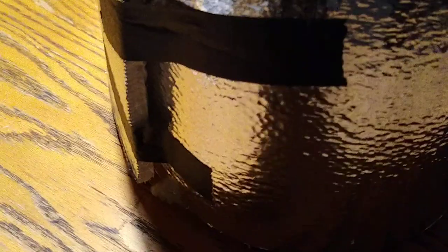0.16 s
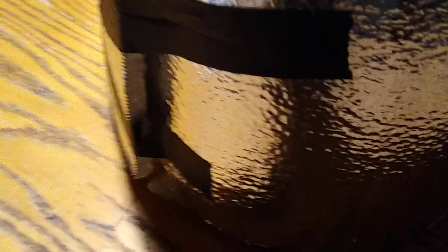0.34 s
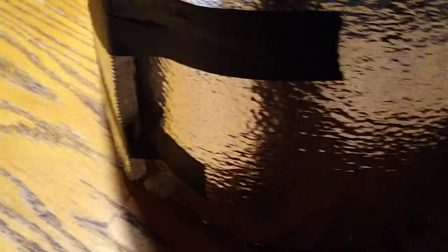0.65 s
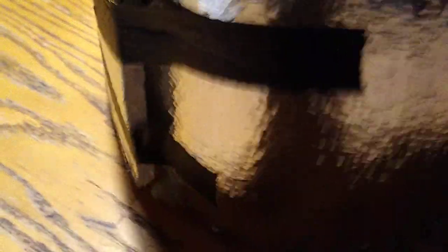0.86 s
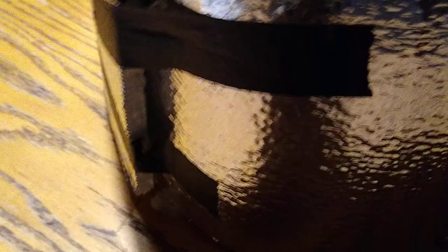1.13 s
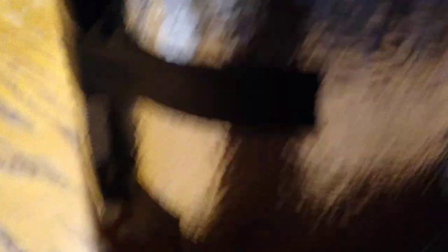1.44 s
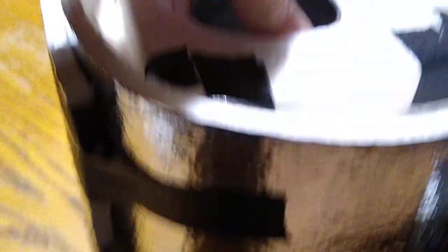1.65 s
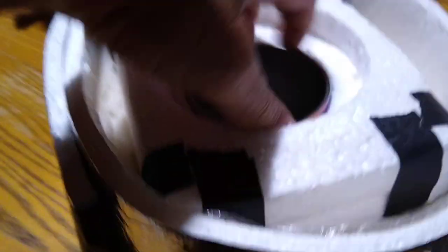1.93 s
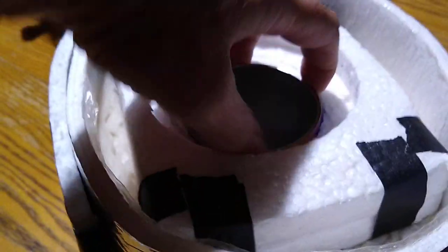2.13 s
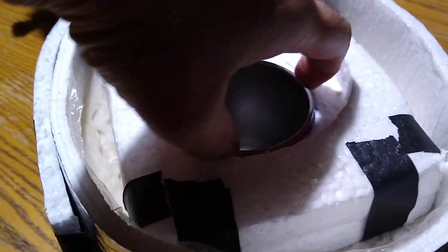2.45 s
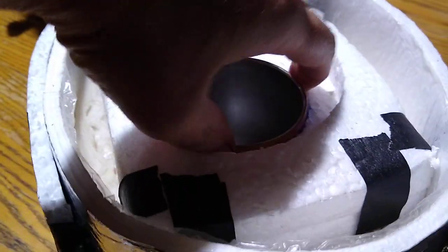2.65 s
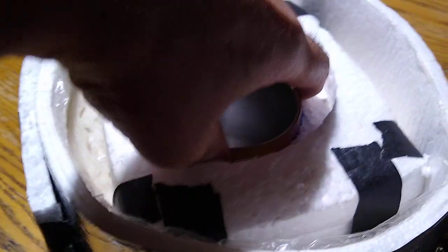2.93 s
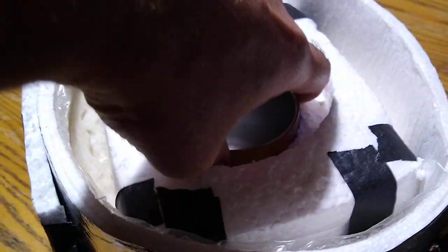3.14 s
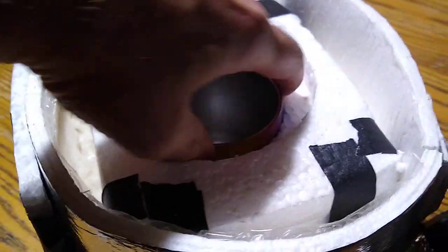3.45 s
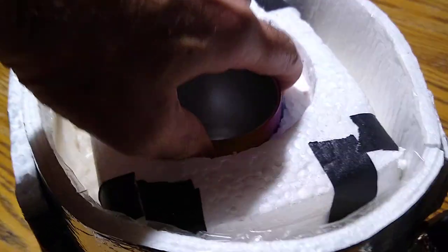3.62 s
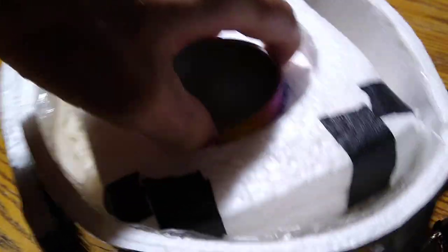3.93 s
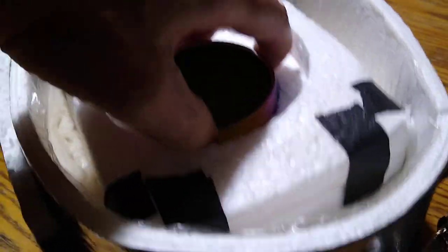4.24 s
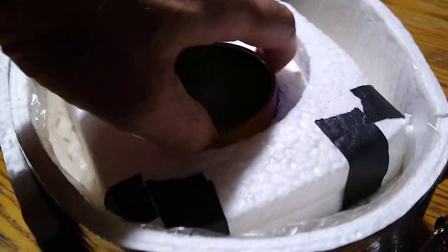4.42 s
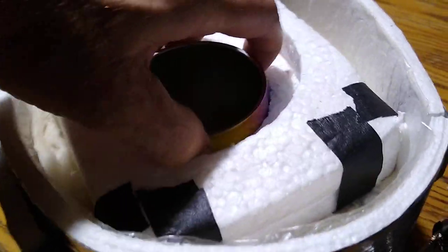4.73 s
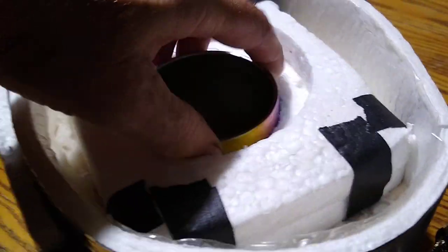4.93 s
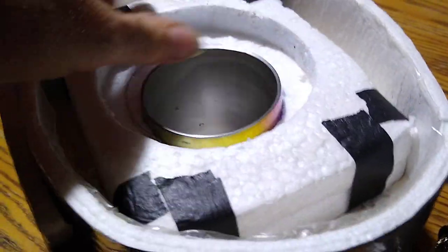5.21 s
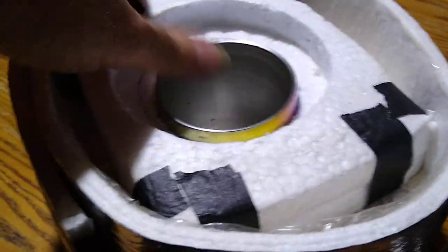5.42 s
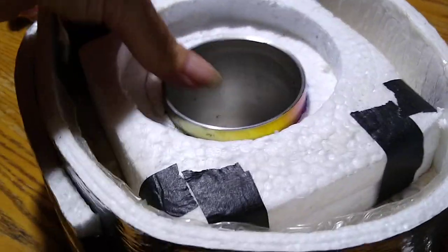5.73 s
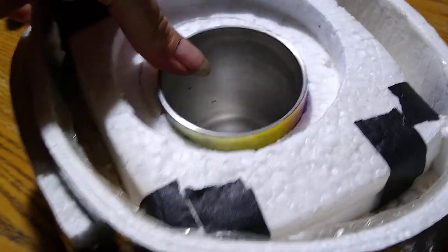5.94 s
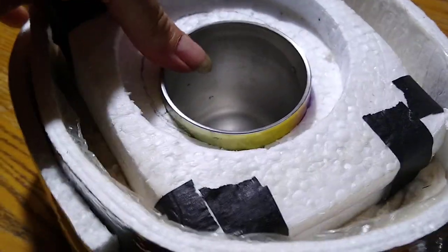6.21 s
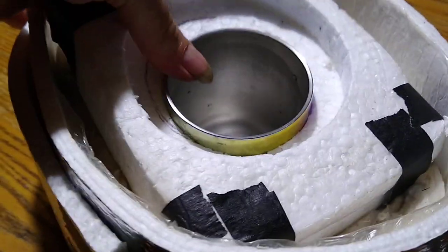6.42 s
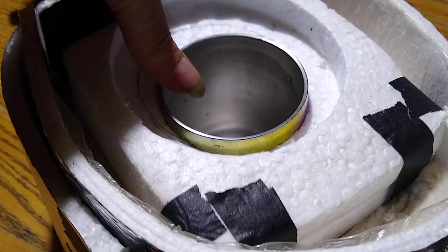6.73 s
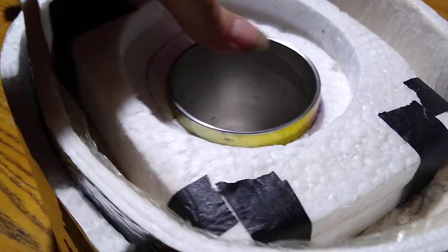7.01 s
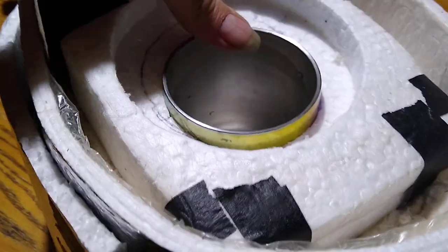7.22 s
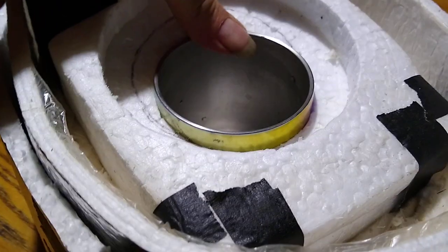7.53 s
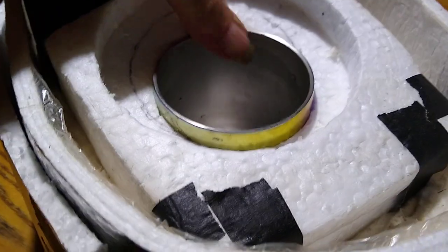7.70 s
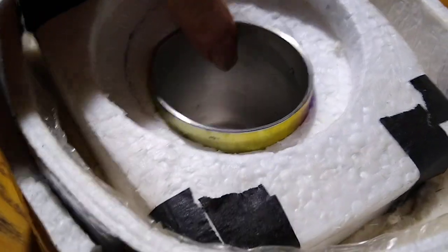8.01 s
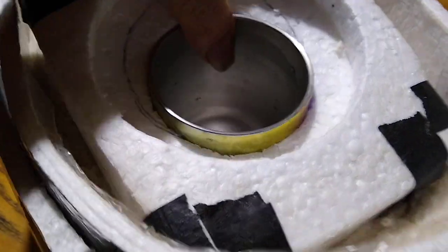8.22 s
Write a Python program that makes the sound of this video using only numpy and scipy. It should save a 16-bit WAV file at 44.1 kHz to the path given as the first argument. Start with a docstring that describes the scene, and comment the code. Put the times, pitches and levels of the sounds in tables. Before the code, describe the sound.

Close-up foam handling: short dry scrapes, crackling wrap, popping beads and hollow knocks, sparse at first, then busier rubbing, over faint room hush.

```python
"""Hands rub and squeeze rigid foam in plastic wrap, close to a phone in a quiet room.
Strokes are dense swarms of tiny slips through resonances of scrape, drumming foam and sizzling wrap.
The wrap snaps and rustles, beads pop, fingers knock the hollow foam, a joint creaks, a cupped cavity hums.
Shaped noise makes the room's hush. Two microphone ports hear it all, and the phone widens the image
by taking each port, delayed, from the other."""
import sys
import numpy as np
from scipy import signal
from scipy.fft import rfft, irfft
from scipy.io import wavfile
from scipy.ndimage import uniform_filter1d

SR = 44100
rng = np.random.default_rng(int(sys.argv[2]) if len(sys.argv) > 2 else 0)


def persist_wave(psi):
    """Save psi, clipped to +-1, as 16-bit WAV."""
    counts = np.round(np.clip(psi, -1, 1) * 32767).astype(np.int16)
    wavfile.write(sys.argv[1], SR, np.atleast_2d(counts).T)


def voltage_ratio(level):
    """Linear amplitude factor for a level in decibels (scalar or array-like)."""
    return 10 ** (np.asarray(level, float) / 20)


N = 368676
T = np.arange(N) / SR
CONTROL = 64  # samples per control step

# strokes of the hand: peak_s, rise_ms, fall_ms (to 1/e of the peak), scrape_db
STROKES = [(0.016, 16, 21.5, -52.5), (0.208, 22, 28.6, -56), (0.322, 6.6, 29, -61),
           (0.403, 7.2, 18.6, -60.5), (0.563, 40, 49, -64.5), (0.667, 32, 31, -58.5),
           (0.769, 15, 36, -52.5), (0.965, 65, 11.6, -48), (1.041, 41, 14, -51.5),
           (1.156, 54.4, 57.5, -40.5), (1.284, 14, 54, -60), (1.369, 24, 26.6, -62.5),
           (1.748, 110, 96, -55.5), (1.978, 46, 9, -50.5), (2.035, 27, 37, -38), (2.15, 84, 110, -46),
           (2.364, 2.1, 36, -50), (2.75, 40, 29, -48.5), (3.06, 105, 270, -68), (3.44, 38, 27, -52.5),
           (3.542, 48, 120, -62), (3.746, 38, 65, -58.5), (3.809, 13, 26, -54), (3.866, 16, 57, -52.5),
           (3.992, 30, 28, -51), (4.09, 30, 44, -49.5), (4.28, 13, 9, -59.5), (4.317, 6, 45, -54),
           (4.683, 17.3, 100, -72.5), (4.83, 14, 18, -57.5), (5.006, 56, 12, -44), (5.055, 27, 19, -42.5),
           (5.15, 48, 27, -49), (5.255, 12.3, 53, -43.5), (5.353, 19, 16, -46), (5.437, 24.4, 140, -46),
           (5.567, 18.5, 47, -36), (5.662, 23, 16, -48.5), (5.704, 10, 60, -48.5), (5.839, 34, 77, -50.5),
           (6.047, 3.1, 12, -40.5), (6.076, 29, 56, -40), (6.36, 75, 83, -60), (6.534, 45, 52, -42.5),
           (6.69, 15.6, 52, -43), (6.781, 41, 65, -35.5), (7.002, 74, 44, -44), (7.142, 36, 48, -42),
           (7.308, 19, 28, -36.5), (7.43, 72, 47, -38), (7.51, 35, 33.4, -39), (7.808, 56, 91, -45),
           (7.947, 32, 31, -51.5), (8.068, 24, 70, -50), (8.22, 63, 33, -54.5), (8.296, 8.2, 40, -56.5)]
# snaps of wrap and beads: start_s, crack_db, drumming_db, sizzle_db (last two relative to the crack)
SNAPS = [(0.0883, -48.5, 1, 4.5), (0.1281, -17, -15, -3), (0.134, -20.5, -4, -6), (0.3226, -53, -5, 13),
         (0.4047, -53.5, -3, 13), (0.699, -39, -3, 1), (0.7964, -38, -41, 9), (0.92, -40.5, -6, 1.5),
         (1.0308, -32.5, -2, 2.5), (1.1428, -25.5, -2.5, 5.5), (1.436, -41, 1.5, -3),
         (1.5051, -42.5, 15, 15), (1.5247, -43, 13.5, 5.5), (2.1107, -19, -8.5, 6.5),
         (2.136, -24, -11.5, -1), (2.1765, -20.5, -44, -3.5), (2.2579, -35, -4, 8.5),
         (2.2918, -32.5, -0.5, 2.5), (2.5589, -31.5, -5, 4), (2.61, -32.5, -3.5, 2),
         (2.7773, -12.5, -13, -10), (2.892, -39, -33, -2), (3.217, -38.5, -8.5, 0.5),
         (3.7407, -37, -0.5, 4.5), (4.0577, -16, -14, -2), (4.1627, -33.5, 3.5, -0.5),
         (4.683, -54, -4, 7.5), (4.8985, -44.5, -7, -2.5), (4.914, -53, -10, -1.5),
         (5.0483, -28.5, -12, -6), (5.164, -41, -20, 10), (5.237, -44.5, 6, -9), (5.5626, -31.5, -26, 6),
         (6.0754, -32.5, 4, 1.5), (7.3009, -23.5, -7, -19), (7.6338, -35, -3.5, 4), (7.823, -34.5, -3, -2),
         (7.9114, -31.5, -6, -6.5), (7.935, -34, -2, -10), (7.957, -39.5, -0.5, -4), (8.199, -43.5, -4, 10),
         (8.2097, -32, -7.5, 8.5)]
# finger knocks: start_s, level_db (before the port gains), pitch_hz (nominal, bent by the sag)
KNOCKS = [(.942, -25.5, 580), (1.504, -25, 576), (1.523, -33.5, 267), (1.75, -42, 188), (2.663, -31.5, 302),
          (3.22, -43.5, 142), (4.164, -23.5, 210), (6.078, -30.5, 141), (7.248, -23.5, 1206),
          (7.299, -24.5, 228), (8.224, -40.5, 109)]
# stick-slip creaks: start_s, end_s, first_slips_per_s, last_slips_per_s, level_db (before the family's)
CREAKS = [(2.82, 3.003, 150, 200, -45), (3.015, 3.169, 70, 80, -52.5), (3.398, 3.475, 74, 210, -43.5)]
# cupped hand: start_s, end_s, pitch_hz of the hollow, hum_db relative to the drumming
CUPPED = [(0.924, 0.977, 1320, 0), (1.11, 1.254, 1290, -4.5), (1.37, 1.396, 1330, -1),
          (2.093, 2.344, 718, -0.5), (4.653, 4.74, 1080, -0.5), (4.945, 5.21, 704, -4.5),
          (5.23, 5.93, 730, -10)]
# balance as the grip moves round the foam: time_s, drumming_db and sizzle_db (relative to the scrape),
# tilt_db_per_octave of the drumming about PIVOT_HZ
GRIP = [(0, 2.5, 6.5, 4), (.4, -4, 6.5, -2.5), (.8, 0, 1, 1.5), (.96, 4.5, 5.5, -2), (1.159, 0.5, 4, 1.5),
        (1.5, 12.5, 15.5, -2.5), (1.75, 0.5, -0.5, 0), (2.03, -6.5, 2, 0), (2.7, 0, -1, -1),
        (3.2, -5, -8.5, 1), (4.001, -7.5, -5, -1.5), (4.17, 0.5, -1, -2), (5.1, -1.5, 3, 0.5),
        (5.26, -1, -3.5, -0.5), (6.3, -3, -3.5, 1.5), (7.0, -2, -1, 2), (8.3, -4.5, -2, 2.5)]
# resonances of foam body, scraped surface and wrap: pitch_hz, width_hz, level_db, left_db (relative to right)
BODY = [(95.5, 115, -0.5, 3.5), (210, 185, -1, 1.5), (399, 276, -1.5, -3), (659, 370, -1.5, -6),
        (1012, 480, -7.5, 1), (1324, 480, -4.5, -5), (1960, 1700, -2.5, -11.5)]
SCRAPE = [(2513, 1340, 1, -4), (3055, 425, 1, -5), (3380, 710, 5, -16.5), (3983, 1500, -2.5, -2.5)]
SIZZLE = [(5870, 2940, -6.5, 1), (8800, 5900, -14.5, 5.5), (9200, 720, -5.5, 8.5), (11330, 3000, -5.5, 4),
          (14630, 6040, 4.5, -3)]
# scrape, drumming, sizzle in turn: resonances, common_share (0-1, of both ports), waver_db, snap_t60_s, creak_db
FAMILIES = [(SCRAPE, 0.045, 2.82, 0.0065, 0), (BODY, 0.89, 3.04, 0.0051, -8),
            (SIZZLE, 0.061, 2.7, 0.0085, -9.5)]
# colour of the room's hush: pitch_hz, level_db per Hz (relative)
ROOM = [(30, -9), (100, 6.5), (212, -0.5), (238, 8), (265, -1.5), (3200, -9), (6000, -21.5), (15000, -18.5)]
# copy taken from the other side: pitch_hz, share (0-1), extra_lag_cycles
CROSSFEED = [(0, 0.94, 0.011), (400, 0.91, 0.0094), (7800, 0.74, 0.0086), (9830, 0.56, 0.062),
             (11700, 0.14, .3), (15000, 0, 0.42)]

# a harder stroke drums and sizzles relatively less: dB for each dB of scrape above the usual stroke
USUAL_DB, DRUM_SLOPE, SIZZLE_SLOPE = -50, -0.38, -0.12
# every stroke leaves a faint tail as the foam settles; its power falls to 1/e in SETTLE_MS
SETTLE_DB, SETTLE_MS = -21, 88
# single beads pop at random under the strokes, relative to the rubbing
POPS_PER_S, POP_DB, POP_SPREAD_DB = 70, 11, 4
# every snap and creaking slip starts with one clean click; the wrap rustles on after every snap
CLICK_DB, RUSTLE_DB, RUSTLE_T60_S = 10.5, -23.5, 0.16
# every knock leaves a rattle in the foam
RATTLE_DB, RATTLE_T60_S = -14, 0.12
PIVOT_HZ = 700
HOLLOW_WIDTH_HZ = 88  # at PIVOT_HZ; a smaller, higher hollow is leakier
ROOM_DB = -70.5
CROSS_MS = 0.4483
LOW_CUT_HZ, TOP_HZ = 21, 15500


def foam():
    """Strokes, snaps, pops and creaks drive the same three sets of resonances; knocks and hum join them."""
    s, rub_db = np.transpose(STROKES)[[0, 3]]
    when, drum_db, sizzle_db, tilt_db = np.transpose(GRIP)
    harder = rub_db - USUAL_DB
    rub_drum = np.interp(s, when, drum_db) + DRUM_SLOPE * harder
    rub_sizzle = np.interp(s, when, sizzle_db) + SIZZLE_SLOPE * harder
    crack_db, snap_drum, snap_sizzle = np.transpose(SNAPS)[1:]
    # the hand's pressure flutters for all resonances alike; each set has its own swarm of slips
    flutter = smooth(voltage_ratio(2.0 * walk(60)))
    swarms = [flutter * grain(per_s=500, spread_db=2, t60=0.0086, hiss=1.0) for _ in FAMILIES]
    pops = bead_pops()
    creak = creaks()
    out = knocks() + hollow(strokes(rub_db + rub_drum) * swarms[1])
    rub_balance = [0, rub_drum, rub_sizzle]
    snap_balance = [0, snap_drum, snap_sizzle]
    tilts = [0, np.interp(T[::CONTROL], when, tilt_db), 0]
    for family, rub, snap, tilt, slips in zip(FAMILIES, rub_balance, snap_balance, tilts, swarms):
        modes, share, waver_db, t60, creak_db = family
        snap_db = crack_db + snap
        rubbing = strokes(rub_db + rub)
        rustle = burst(snap_db + RUSTLE_DB, RUSTLE_T60_S)
        drive = (rubbing + rustle) * slips
        drive = drive + burst(snap_db, t60) + voltage_ratio(creak_db) * fade(creak, 0.0074)
        click = kick(SNAPS, snap_db + CLICK_DB) + pops * rubbing
        click = click + voltage_ratio(creak_db + CLICK_DB) * creak
        out = out + ring(drive, modes, share, waver_db, click=click, tilt_db=tilt)
    return out + rattle(swarms[1])


def strokes(db):
    """Each stroke swells to its peak, dies on a bell curve and settles slowly; powers add."""
    step = T[::CONTROL]
    s, rise, fall = np.transpose(STROKES)[:3, :, None]
    late_ms = 1000 * (step - s)
    bell = np.exp(-2 * (late_ms / np.where(late_ms < 0, rise, fall)) ** 2)
    settling = (late_ms > 0) * voltage_ratio(2 * SETTLE_DB) * np.exp(-np.abs(late_ms) / SETTLE_MS)
    return np.interp(T, step, np.sqrt(voltage_ratio(2 * db) @ (bell + settling)))


def grain(per_s, spread_db, t60, hiss):
    """Loudness of a swarm of slips over a smooth hiss; rms 1."""
    size_db = np.minimum(spread_db * rng.exponential(size=N), 9.5)
    slips = (rng.random(N) < per_s / SR) * voltage_ratio(size_db)
    swarm = fade(slips, t60) + hiss
    return swarm / np.sqrt(np.mean(swarm ** 2))


def ring(drive, modes, share, waver_db, click=0, tilt_db=0):
    """Steep resonances side by side, fed by shifted noise and wavering as the grip shifts."""
    # dividing by the summed bandwidths makes the noise keep its level
    power = sum(voltage_ratio(2 * db) * np.pi * width / (2 * SR) for _, width, db, _ in modes)
    noise = ports(far_db=0, share=share)
    out = 0
    for k, (hz, width, db, far_db) in enumerate(modes):
        tilt = tilt_db * np.log2(hz / PIVOT_HZ)
        gain = smooth(voltage_ratio(db + waver_db * walk(14) + tilt))
        own_noise = np.roll(noise, k * N // len(modes), axis=1)
        force = drive * gain * own_noise + click * voltage_ratio(db)
        out = out + resonate(force, hz, width) * voltage_ratio(np.array([[far_db], [0]]))
    return out / np.sqrt(power)


def resonate(force, hz, width):
    """One steep resonance: the same peak filter twice in a row."""
    peak = signal.iirpeak(hz, hz / width, SR)
    return signal.lfilter(*peak, signal.lfilter(*peak, force))


def burst(db, t60):
    """Loudness of the snaps: each jumps up and dies away over t60, its onset slightly rounded."""
    return uniform_filter1d(fade(kick(SNAPS, db), t60), size=8)


def bead_pops():
    """Single beads let go at random instants, with sizes spread upwards."""
    size_db = POP_DB + POP_SPREAD_DB * np.minimum(rng.exponential(size=N), 2)
    return (rng.random(N) < POPS_PER_S / SR) * voltage_ratio(size_db)


def knocks():
    """Each finger blow rings the foam for a few cycles, sagging in pitch, stronger at the left port."""
    out, t = np.zeros(N + 8192), np.arange(8192) / SR
    for s, db, hz in KNOCKS:
        fall = np.exp(-np.log(1000) * t / (0.0055 + 5.4 / hz))
        pitch = hz * (0.786 + 0.53 * fall)
        tone = np.sin(2 * np.pi * np.cumsum(pitch) / SR)
        out[int(s * SR):][:8192] += voltage_ratio(db) * fall * tone
    return out[:N] * voltage_ratio(np.array([[1.5], [-2.5]]))


def rattle(slips):
    """After every knock a dying swarm of slips rattles the foam body."""
    dying = fade(kick(KNOCKS, np.transpose(KNOCKS)[1] + RATTLE_DB), RATTLE_T60_S)
    return ring(dying * slips, BODY, share=0.81, waver_db=2.0, tilt_db=-1.5)


def creaks():
    """Slightly uneven stick-slip kicks whose rate glides, swelling and fading."""
    kicks = np.zeros(N)
    for start, end, first, last, db in CREAKS:
        s = start
        for jitter, size in rng.standard_normal((64, 2)):
            part = (s - start) / (end - start)
            if part < 1:
                swell = np.sin(np.pi * (0.33 + 0.49 * part))
                kicks[int(s * SR)] = voltage_ratio(db + 1.14 * size) * swell
            s += np.exp(0.086 * jitter) / (first + (last - first) * part)
    return kicks


def hollow(drumming):
    """While the hand cups the foam, the cavity under it hums along with the drumming."""
    force = drumming * ports(far_db=0, share=.8)
    out = np.zeros((2, N))
    for start, end, hz, db in CUPPED:
        span = slice(int(start * SR), int(end * SR))
        width = HOLLOW_WIDTH_HZ * (hz / PIVOT_HZ) ** 2
        hum = resonate(force[:, span], hz, width) / np.sqrt(np.pi * width / (2 * SR))
        swell = np.sin(np.linspace(0, np.pi, hum.shape[1])) ** .5
        out[:, span] += voltage_ratio(db) * hum * swell
    return out


def kick(rows, db):
    """One impulse at the time of each row."""
    kicks = np.zeros(N)
    kicks[(np.array(rows)[:, 0] * SR).astype(int)] = voltage_ratio(db)
    return kicks


def fade(kicks, t60):
    """Every kick dies away exponentially, by 60 dB in t60 seconds."""
    return signal.lfilter([1], [1, -np.exp(-np.log(1000) / (t60 * SR))], kicks)


def walk(rate):
    """Random levels every 1 / rate s, joined by lines, at the control rate; spread near 1."""
    count = int(T[-1] * rate) + 2
    return 1.26 * np.interp(T[::CONTROL] * rate, np.arange(count), rng.standard_normal(count))


def smooth(control):
    """From the control rate to the sample rate, holding each value."""
    return np.repeat(control, CONTROL)[:N]


def ports(far_db, share):
    """Noise at the far (left) and near (right) port, partly in common."""
    near, own = rng.standard_normal((2, N))
    share = np.clip(share, 0, 1)
    far = share * near + np.sqrt(1 - share ** 2) * own
    return np.array([voltage_ratio(far_db) * far, near])


def room():
    """The steady hush of the room and the microphones: noise shaped in the spectrum."""
    hz, db = np.transpose(ROOM)
    bins = np.log(np.fft.rfftfreq(N, 1 / SR) + 1)
    colour = voltage_ratio(np.interp(bins, np.log(hz), db))
    hush = irfft(rfft(ports(-1.5, 0.22)) * colour, N)
    return hush * voltage_ratio(ROOM_DB) / np.std(hush)


def scene():
    """Foam over the room."""
    return foam() + room()


def top_cut(x):
    """Nothing passes above the cut-off."""
    return signal.sosfilt(signal.butter(12, 16800, fs=SR, output="sos"), x)


def record(dry):
    """Each side loses a delayed, duller copy of the other; bass and top are cut."""
    hz = np.fft.rfftfreq(N, 1 / SR)
    at, share, lag = np.transpose(CROSSFEED)
    cycles = hz * CROSS_MS / 1000 + np.interp(hz, at, lag)
    cross = np.interp(hz, at, share) * np.exp(-2j * np.pi * cycles)
    edges = (hz < TOP_HZ) / np.sqrt(1 + (LOW_CUT_HZ / (hz + 1)) ** 4)
    sides = rfft(dry)
    mix = irfft((sides - cross * sides[::-1]) * edges, N)
    return top_cut(mix)


dry = scene()
out = record(dry)
persist_wave(out)
```